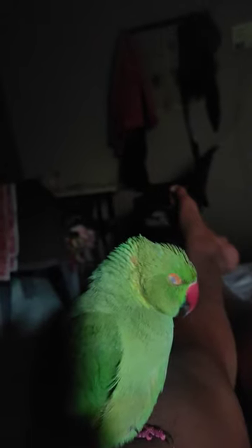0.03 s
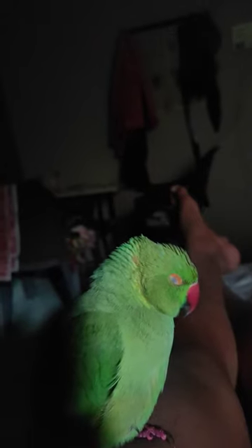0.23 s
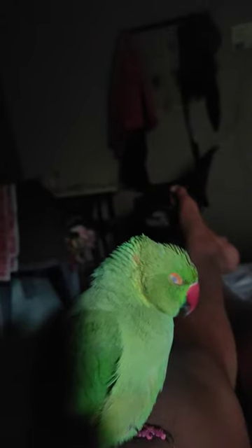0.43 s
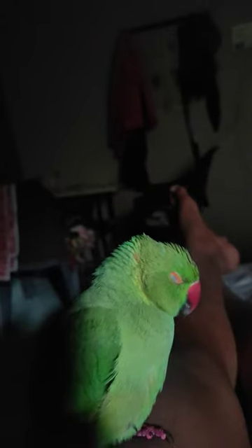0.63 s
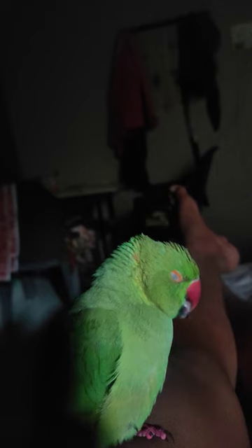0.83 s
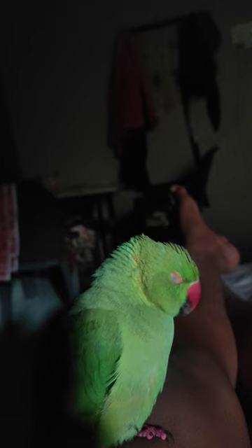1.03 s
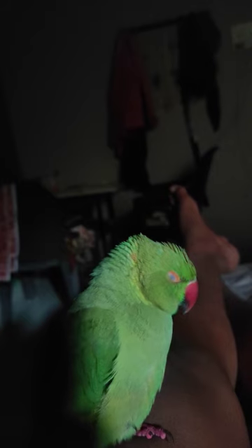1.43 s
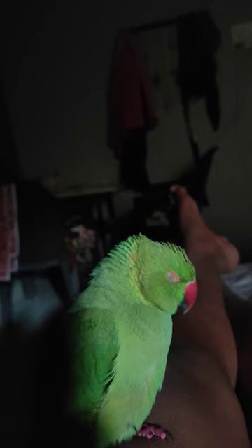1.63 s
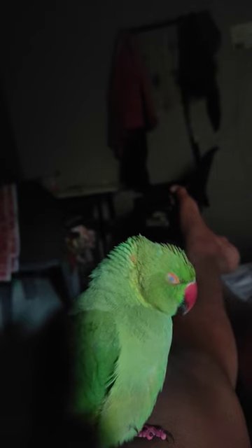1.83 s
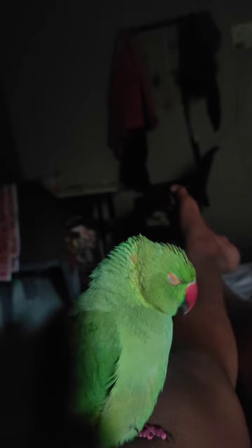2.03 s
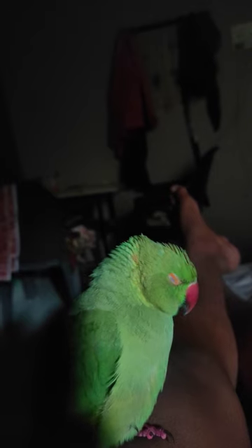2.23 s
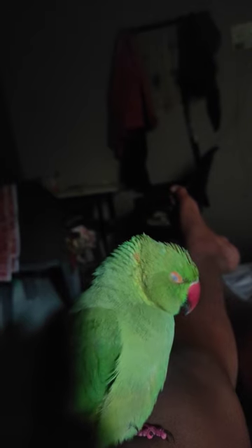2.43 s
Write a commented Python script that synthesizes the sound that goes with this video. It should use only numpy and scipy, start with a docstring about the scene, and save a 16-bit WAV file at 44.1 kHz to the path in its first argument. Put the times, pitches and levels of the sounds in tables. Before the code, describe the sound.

A parrot calls close to the microphone in a quiet room. A short rising squeak comes at 0.25 seconds, then a softer falling whine from 0.6 to 0.9. A quick, sharp falling chirp follows just after 1 second, a soft cluck at 1.5 and another squeak at 1.75. Each rings briefly. Very faint rustles, ticks and bumps continue until about 2.6 seconds over low room tone.

```python
"""A parrot's rising squeak, close to the microphone in a quiet room, then a long falling whine, a quick
falling chirp, a short cluck and a second squeak. Its syrinx makes a gliding harmonic tone and puffs of
air, coloured by the throat and dulled as the beak closes. The room rings briefly after each call.
Faint ticks, rustles and soft bumps lie around the bird, over a low, steady room tone."""
import sys
import numpy as np
from scipy import signal
from scipy.fft import rfft, irfft
from scipy.io import wavfile

SR = 44100
rng = np.random.default_rng(int(sys.argv[2]) if len(sys.argv) > 2 else 0)


def dump_mix(stems):
    """Bounce the given channels to the path in sys.argv[1] as a 16-bit WAV at rate SR."""
    frames = np.atleast_2d(stems).T  # one column per channel
    limited = np.clip(frames, -1, 1)  # hard clip at full scale
    pcm = np.round(limited * 32767).astype(np.int16)
    wavfile.write(sys.argv[1], SR, pcm)


N = 114660  # 2.6 s

# The syrinx through each call: time_s, pitch_hz, level_db, overtone_boost_db_per_octave
FIRST_SQUEAK = [(.230, 1332, -50.5, -20), (.243, 1309, -40.5, -9.5), (.2485, 1334, -20.5, -1),
                (.270, 1348, -20, 1), (.279, 1406, -22, 1), (.287, 1468, -19.5, -3),
                (.292, 1426, -25, -0.5), (.297, 1596, -22.5, -9), (.302, 1530, -49, -3)]
WHINE = [(.578, 1050, -60, -11.5), (.590, 1004, -36, -6), (.598, 988, -27.5, 0.5), (.625, 923, -30, -2),
         (.658, 876, -32.5, -5.5), (.700, 837, -29.5, 0.5), (.735, 787.8, -29, 1), (.775, 746.6, -31, 0.5),
         (.810, 686.5, -33, 2), (.850, 636, -30.5, -2), (.880, 564.6, -34, -3), (.910, 527.3, -39.5, -4.5),
         (.932, 481, -56, -12.5)]
CHIRP = [(1.051, 2292, -48, -15.5), (1.056, 2150, -37.5, -10), (1.059, 2138, -15.5, -3),
         (1.066, 1931, -16.5, 1.5), (1.073, 1713, -18.5, -4), (1.080, 1539, -23, -8),
         (1.086, 1507, -24.5, -14), (1.091, 1530, -44, -24)]
CLUCK = [(1.523, 662.5, -55, -11), (1.526, 645, -37, -7.5), (1.528, 607, -30, 2), (1.533, 596, -36, 0),
         (1.539, 651.5, -37.5, -3.5), (1.549, 591, -40.5, -6.5), (1.560, 553, -46, -4.5),
         (1.575, 590, -58.5, -9)]
SECOND_SQUEAK = [(1.729, 1248, -65.5, -28), (1.740, 1259, -30.5, -30), (1.7455, 1211, -21, -1),
                 (1.757, 1205, -22.5, 1), (1.768, 1220, -21, -1.5), (1.781, 1251, -23.5, -3),
                 (1.788, 1292, -22.5, -5), (1.795, 1374, -29.5, -20), (1.800, 1280, -69, -5)]
# Resonances of throat and beak in each call: frequency_hz, gain_db
FIRST_SQUEAK_THROAT = [(400, -37), (900, -18), (1300, -0.5), (2700, 0.5), (4050, -6.5), (4700, -20),
                       (5400, -10), (6750, -13), (8000, -25), (9000, -23.5), (9600, -33), (10300, -19),
                       (11600, -36), (13000, -34), (15000, -48)]
WHINE_THROAT = [(500, 1), (950, 1), (1350, 3), (1950, 2), (2350, -13), (2750, -8), (3050, -13.5),
                (3450, -11.5), (4000, -24.5), (4450, -47.5), (4900, -25), (5300, -24.5), (6400, -26),
                (7500, -47), (8800, -61.5), (12500, -65.5), (15000, -55.5)]
CHIRP_THROAT = [(900, -8), (1500, 0.5), (2150, -1.5), (3200, -5.5), (4200, -16), (5000, -17), (6200, -14),
                (8000, -29), (9500, -52), (13500, -41.5), (15000, -60.5)]
CLUCK_THROAT = [(600, 3), (1200, 2), (1820, 4.5), (2400, -9.5), (3600, -6.5), (4700, -24), (6200, -18.5),
                (7500, -31), (10000, -44), (15000, -58.5)]
SECOND_SQUEAK_THROAT = [(400, -34.5), (850, -17), (1200, -3.5), (2450, 2), (3650, -7.5), (4850, -24.5),
                        (6050, -16.5), (7250, -20), (8450, -27), (9700, -37.5), (12000, -40.5),
                        (15000, -46)]
def parrot():
    """Five calls close to the microphone, each with its own share of room sound behind it."""
    calls = [
        call(FIRST_SQUEAK, FIRST_SQUEAK_THROAT, jitter=0.006, flutter=0.019,
             air_db=-38.5, closing_s=0.013, closed_hz=9000),
        call(WHINE, WHINE_THROAT, jitter=0.003, flutter=0.013,
             air_db=-48.5, closing_s=0.066, closed_hz=2350, third_harmonic_db=-9.5),
        call(CHIRP, CHIRP_THROAT, jitter=0.006, flutter=0.028,
             air_db=-35, closing_s=0.015, closed_hz=6860),
        call(CLUCK, CLUCK_THROAT, jitter=0.008, flutter=0.028,
             air_db=-11, closing_s=0.016, closed_hz=2000),
        call(SECOND_SQUEAK, SECOND_SQUEAK_THROAT, jitter=0.006, flutter=0.019,
             air_db=-32.5, closing_s=0.018, closed_hz=4490)]
    room_sends_db = (-21.5, -21, -19.5, -19, -19.5)
    into_room = sum(amp(db) * sound for sound, db in zip(calls, room_sends_db))
    low_cut = signal.butter(2, 310, "high", fs=SR, output="sos")  # the small beak radiates no bass
    return signal.sosfilt(low_cut, near_echoes(sum(calls)) + room_ring(into_room))


def call(curve, throat, jitter, flutter, air_db, closing_s, closed_hz, third_harmonic_db=0):
    """The syrinx gives a rough, gliding tone and puffs of air; the closing beak dulls the tone."""
    times, *columns = np.transpose(curve)
    span = np.arange(round(times[0] * SR), round(times[-1] * SR))
    size, t = len(span), span / SR
    pitch_hz, level_db, boost_db = (np.interp(t, times, column) for column in columns)
    phase = 2 * np.pi * np.cumsum(pitch_hz * (1 + jitter * wobble(size, rate_hz=400))) / SR
    # The beak's cutoff drops an octave every closing_s and ends at closed_hz.
    cutoff_hz = closed_hz * 2 ** np.minimum((t[-1] - t) / closing_s, 10)
    hz, response = throat_response(throat)
    tone = np.zeros(size)
    for k in range(1, 25):
        harmonic_hz = k * pitch_hz
        syrinx = amp(boost_db * np.log2(min(k, 9)) + third_harmonic_db * (k == 3))
        beak = 1 / np.sqrt(1 + (harmonic_hz / cutoff_hz) ** 8)
        depth = flutter * k ** 1.35  # upper harmonics flutter more
        shake = depth * (wobble(size, rate_hz=260) + 1j * wobble(size, rate_hz=260))
        wave = np.interp(harmonic_hz, hz, response) * unit(1 + shake) * np.exp(1j * k * phase)
        tone += np.sqrt(2) * syrinx * beak * wave.real * (harmonic_hz < SR / 2)
    puffs = amp(air_db + boost_db) * noise(throat)[span] * (1 + np.cos(phase))  # one each cycle
    from_edge_s = np.minimum(t - t[0], t[-1] - t)
    fade = np.sin(np.pi / 2 * np.clip(from_edge_s / 0.0019, 0, 1)) ** 2  # soft start and stop
    sound = np.zeros(N)
    sound[span] = amp(level_db) * fade * (tone + puffs)
    return sound


def throat_response(throat):
    """The throat as a causal filter: frequencies, and complex gains that carry its phase lag."""
    hz = abs(np.fft.fftfreq(4096, 1 / SR))
    log_gain = np.conj(signal.hilbert(np.log(amp(spectrum_at(throat, hz)))))
    half = len(hz) // 2
    return hz[:half], np.exp(log_gain)[:half]


# Reflections off surfaces close to the bird: delay_s, gain_db
NEAR_ECHOES = [(.0016, -22.5), (.0043, -18.5), (.0095, -26.5)]
def near_echoes(direct):
    """The direct sound reaches the microphone with its first reflections just behind."""
    return direct + sum(amp(db) * np.pad(direct, (round(abs(delay_s) * SR), 0))[:N]
                        for delay_s, db in NEAR_ECHOES)


# Time the room takes to die away by 60 dB: frequency_hz, decay_s
ROOM_DECAY = [(300, 0.49), (1300, 0.43), (3500, 0.39), (7000, 0.31), (14000, 0.1)]
# Colour of the room's ring at the microphone: frequency_hz, gain_db
ROOM_COLOUR = [(300, 0.5), (700, -2.5), (1500, -1), (2500, -2), (3700, -1.5), (4400, 0), (4850, 8.5),
               (5400, -0.5), (6500, -3.5), (10000, -4), (15000, -1.5)]
def room_ring(sound, onset_s=0.0052):
    """Dense reflections of random sign, each band dying at its own speed."""
    count, spacing = 1800, 20  # one reflection in every 20 samples
    taps = np.zeros(SR)
    taps[np.arange(count) * spacing + rng.integers(0, spacing, count)] = rng.choice([-1., 1.], count)
    hz, t, bands = signal.stft(taps, SR, nperseg=256)
    gain_db = spectrum_at(ROOM_COLOUR, hz)[:, None] - 60 * t / spectrum_at(ROOM_DECAY, hz)[:, None]
    tail = signal.istft(bands * amp(gain_db), SR, nperseg=256)[1]
    tail *= 1 - np.exp(-(np.arange(len(tail)) / SR / onset_s) ** 2)
    return signal.fftconvolve(sound, tail / np.linalg.norm(tail))[:N]


# Small noises around the bird: peak_s, level_db, rise_s, decay_s
TICKS = [(1.667, -48.5, 0.0041, 0.0021), (2.119, -50, 0.0049, 0.0033), (2.596, -54, 0.0033, 0.018)]
RUSTLES = [(1.125, -62, 0.0148, .02), (1.37, -74, 0.04, 0.021), (1.83, -59, 0.041, 0.059),
           (2.07, -62.5, 0.011, 0.05), (2.27, -70, 0.03, 0.039), (2.428, -58.5, 0.018, 0.032)]
BUMPS = [(1.89, -56.5, 0.015, 0.056), (1.945, -64, 0.015, 0.013), (2.52, -59.5, 0.0065, 0.011)]
# Their colours, sharp, airy and dull in turn: frequency_hz, gain_db
TICK_COLOUR = [(300, -13), (1500, -12), (2400, -8.5), (3000, 0), (4000, -0.5), (4900, -13.5), (6500, -13.5),
               (8500, -25), (15000, -32)]
RUSTLE_COLOUR = [(200, -16), (1400, 6.5), (3000, 5), (7000, 2), (10000, 0), (15000, 0.5)]
BUMP_COLOUR = [(30, -19), (80, 0), (170, 0.5), (350, -5.5), (700, -18), (3000, -41)]
def stirrings():
    """Faint ticks and rustles that ring in the room, and soft bumps that stay dry."""
    ticks = bursts(TICKS, TICK_COLOUR)
    rustles = bursts(RUSTLES, RUSTLE_COLOUR)
    bumps = bursts(BUMPS, BUMP_COLOUR)
    return ticks + rustles + bumps + room_ring(amp(-1) * ticks + amp(-11.5) * rustles)


# A faint sound dying away in the room at the start: peak_s, level_db, rise_s, decay_s
FADING_SOUND = [(.005, -57.5, 0.022, 0.031)]
# Colours of that sound and of the still room at the microphone: frequency_hz, gain_db
FADING_COLOUR = [(100, -8.5), (400, 9), (1200, -4), (2400, 1), (4500, -21), (9000, -30), (15000, -39.5)]
ROOM_TONE_COLOUR = [(15, -46.5), (30, -26.5), (45, -3.5), (65, -0.5), (172, -3), (500, -7.5), (800, -13),
                    (1300, -15), (1700, -20.5), (2850, -20.5), (6700, -25), (15000, -32.5)]
def room_tone(level_db=-66):
    """The low, steady noise of the room, with a faint sound dying away before the first call."""
    return amp(level_db) * noise(ROOM_TONE_COLOUR) + bursts(FADING_SOUND, FADING_COLOUR)


def bursts(rows, colour, grain_db=2.5):
    """Short grainy swells of noise that rise and die away."""
    t = np.arange(N) / SR
    envelope = np.zeros(N)
    for peak_s, level_db, rise_s, decay_s in rows:
        age = t - peak_s
        envelope += amp(level_db) * np.exp(-np.where(age < 0, (age / rise_s) ** 2, age / abs(decay_s)))
    return envelope * unit(noise(colour) * amp(grain_db * wobble(N, rate_hz=300)))


def noise(colour):
    """Noise of rms 1 with the given spectrum."""
    gain = amp(spectrum_at(colour, np.fft.rfftfreq(N, 1 / SR)))
    return unit(irfft(rfft(rng.standard_normal(N)) * gain, N))


def wobble(size, rate_hz):
    """Random unsteadiness of rms 1, up to about the given rate."""
    hz = np.fft.rfftfreq(size, 1 / SR)
    return unit(irfft(rfft(rng.standard_normal(size)) / (1 + (hz / rate_hz) ** 2), size))


def spectrum_at(points, hz):
    """Interpolates a table on a log-frequency axis."""
    points_hz, values = np.transpose(points)
    return np.interp(np.log(hz + 1), np.log(points_hz + 1), values)


def amp(db):
    """Decibels to gain."""
    return 10 ** (np.asarray(db) / 20)


def unit(x):
    """Scales to rms 1."""
    return x / np.sqrt(np.mean(abs(x) ** 2) + 1e-20)


def scene():
    """One microphone: the bird up close, small noises around it, the quiet room behind."""
    background = room_tone()
    return (parrot() + stirrings() + background)[None]


def record(dry):
    """The recorder passes nothing above its band limit."""
    band_limit = signal.firwin(511, 15580, window=("kaiser", 9), fs=SR)  # cutoff in Hz
    return signal.oaconvolve(dry, band_limit[None], "same")


dry = scene()
out = record(dry)
dump_mix(out)
```